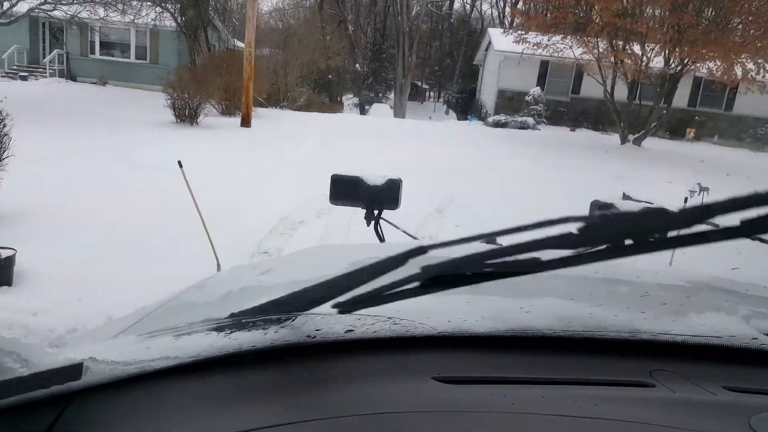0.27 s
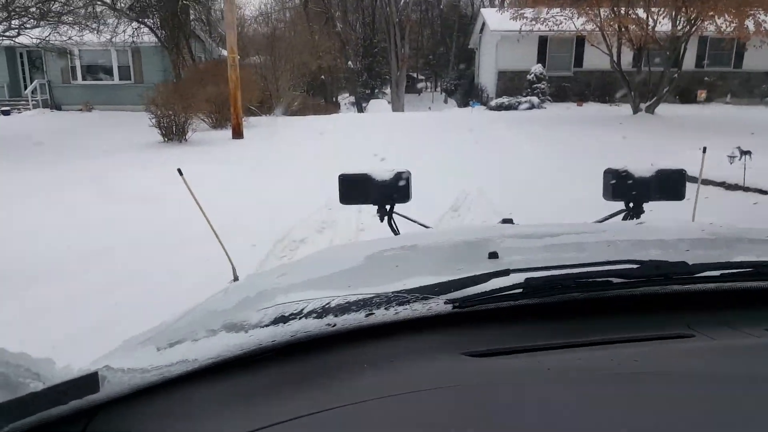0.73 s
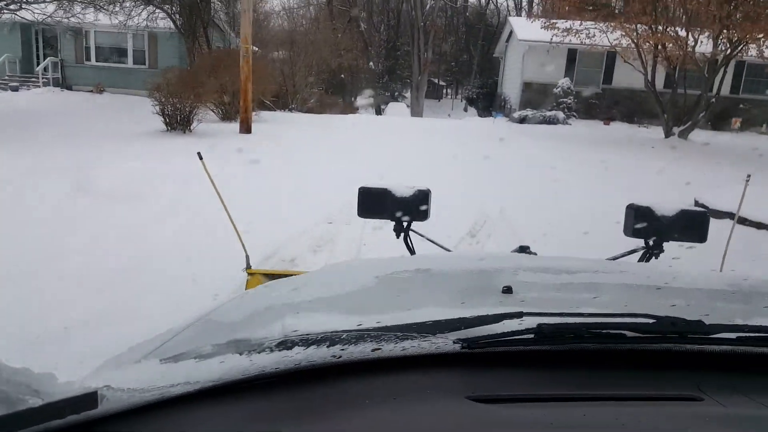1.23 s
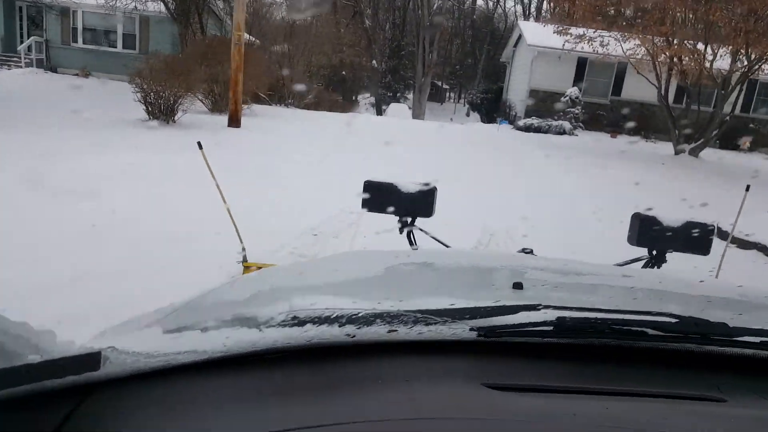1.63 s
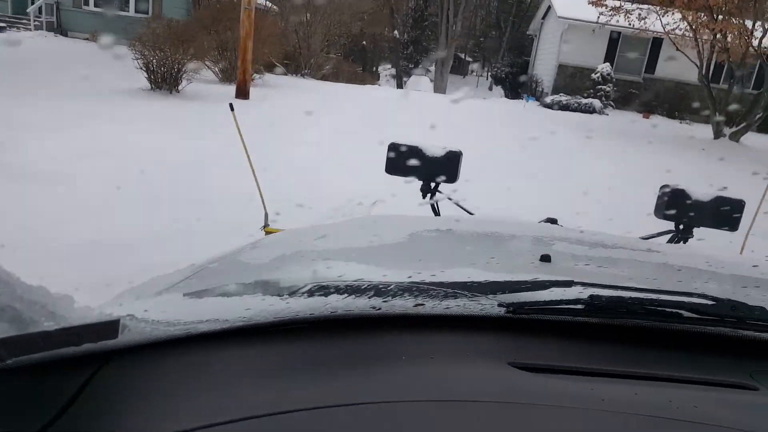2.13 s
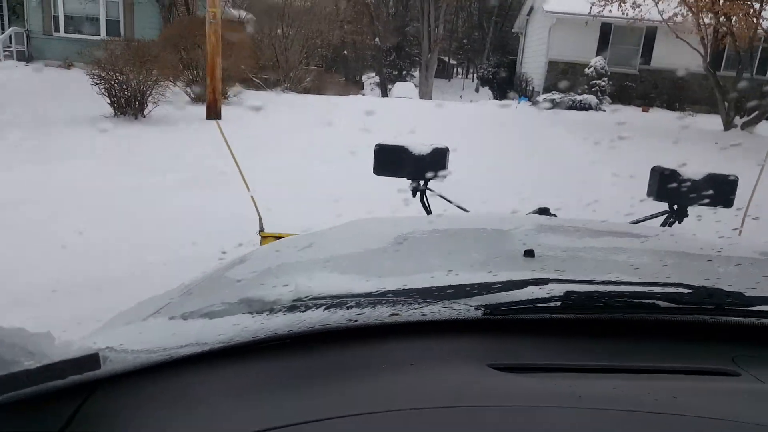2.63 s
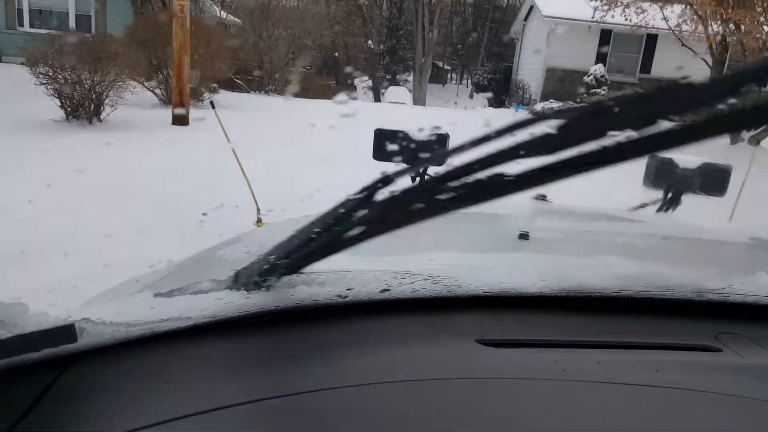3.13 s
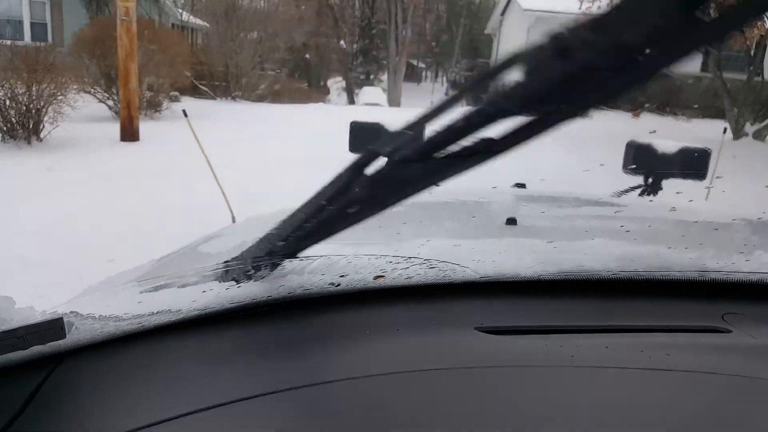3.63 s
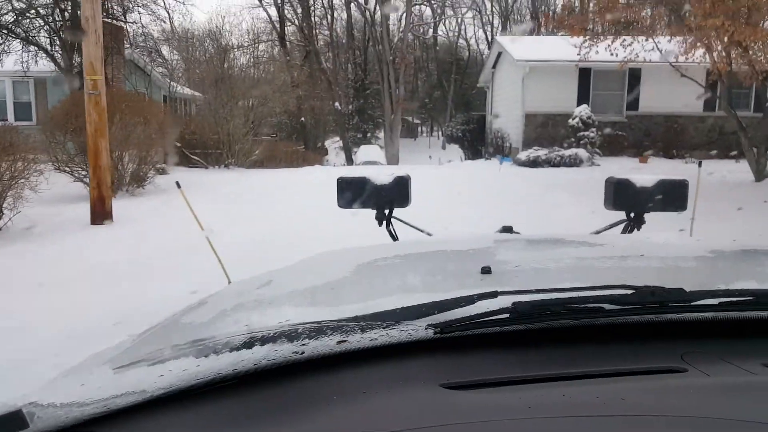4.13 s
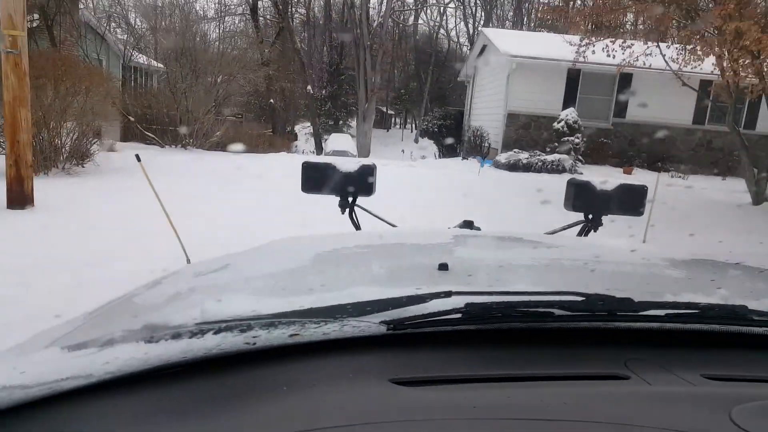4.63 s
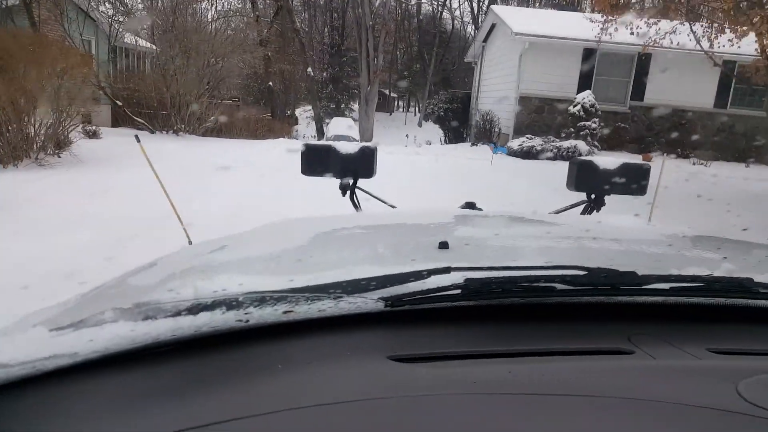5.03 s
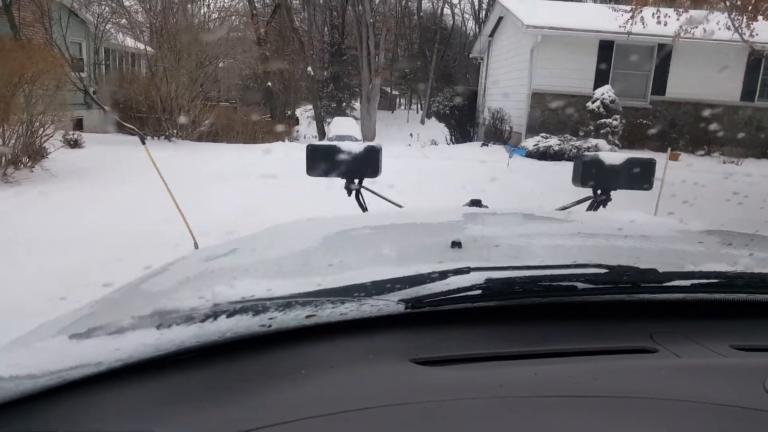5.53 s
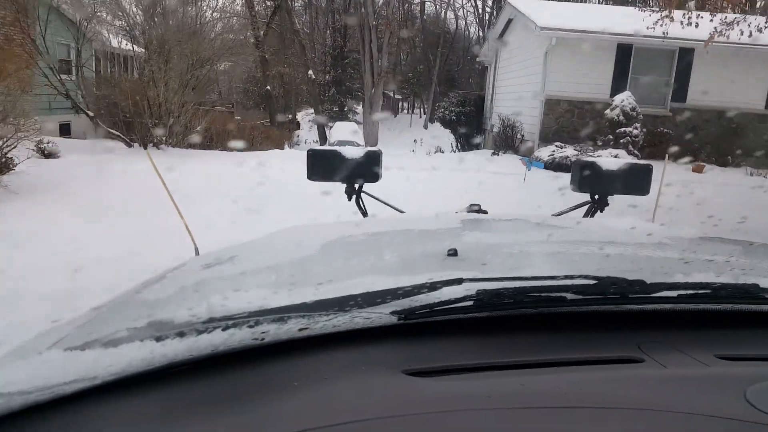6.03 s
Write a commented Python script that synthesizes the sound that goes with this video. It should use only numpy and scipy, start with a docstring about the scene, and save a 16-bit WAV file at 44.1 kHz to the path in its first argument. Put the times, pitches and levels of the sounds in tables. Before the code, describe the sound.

Inside a rumbling truck cab pushing snow, a flasher relay clicks steadily while the blade grinds once, metal clanks, and wipers judder across wet glass.

```python
"""Snow plow cab, pushing along a driveway.

Noise bands and a wandering tone make the engine and the cab's boom, following the load on the plow.
Coloured noise and tiny impacts make the blade scrape, chatter and grind, and the wipers swish and judder.
Short bursts and decaying modes make the flasher relay, loose gear, clicks, trim and lumps of snow.
Decaying low tones are the jolts; filtered impulses are fingers knocking on the hand-held phone."""
import sys
import numpy as np
from scipy import signal
from scipy.fft import rfft, irfft, next_fast_len
from scipy.io import wavfile
from scipy.ndimage import uniform_filter1d

SR = 44100
rng = np.random.default_rng(int(sys.argv[2]) if len(sys.argv) > 2 else 0)


def materialize(psi):
    """Save the field psi as 16-bit PCM at rate SR to the path in sys.argv[1].

    A 1-D psi becomes a single channel; in a 2-D psi each row is a channel.
    """
    bounded = np.clip(np.atleast_2d(psi).T, -1, 1)
    quanta = np.round(bounded * 32767).astype(np.int16)
    wavfile.write(sys.argv[1], SR, quanta)


N = 276507
T = np.arange(N) / SR
FALL = np.log(1000)  # a fall of 60 dB, as an exponent
PULL_LEFT = np.array([[1], [.4]])  # gains of a signal fed to both inputs of ports()


def undb(db):
    """Decibels to gain."""
    return 10 ** (np.asarray(db) / 20)


def unit(x):
    """Scale to an rms of 1."""
    return x / np.sqrt(np.mean(x ** 2))


def curves(table):
    """Each column of a table as a control over time."""
    seconds, *columns = np.transpose(table)
    return [np.interp(T, seconds, column) for column in columns]


def per_bin(points):
    """Points joined on a log-frequency axis, one value per FFT bin."""
    hz, value = np.transpose(points)
    bins_hz = np.fft.rfftfreq(next_fast_len(N), 1 / SR)
    return np.interp(np.log(bins_hz + 1), np.log(hz), value)


def colour(x, points):
    """Causal filter with the shape of a spectrum, closed ends and unit power gain."""
    size = next_fast_len(N)
    closed = [(points[0][0] / 2, -70), *points, (points[-1][0] * 2, -80)]
    gain = unit(undb(per_bin(closed)))
    # folding the cepstrum gives minimum phase, so nothing sounds before its cause
    cepstrum = irfft(np.log(gain), size)
    cepstrum[1:size // 2] *= 2
    cepstrum[size // 2 + 1:] = 0
    response = np.exp(rfft(cepstrum))
    return irfft(rfft(x, size) * response, size)[..., :N]


def noise():
    """Two unrelated white noises."""
    return rng.standard_normal((2, N))


def even(x, span_s):
    """Take out swells slower than the span, so that the gain applied afterwards sets the level."""
    power = uniform_filter1d(x ** 2, int(span_s * SR), axis=-1)
    return x / np.sqrt(power + 1e-9)


def flicker(rate_hz, depth_db):
    """A gain that wavers at random, up to about the given rate."""
    smooth = signal.butter(2, rate_hz, fs=SR, output="sos")
    return undb(depth_db * unit(signal.sosfilt(smooth, rng.standard_normal(N))))


def wander(centre_hz, spread_hz):
    """A rough tone whose strength and phase wander quickly."""
    phase = 2 * np.pi * np.cumsum(centre_hz) / SR
    smooth = signal.butter(2, spread_hz, fs=SR, output="sos")
    sine_part = signal.sosfilt(smooth, noise()) * np.sin(phase)
    cosine_part = signal.sosfilt(smooth, noise()) * np.cos(phase)
    return unit(sine_part + cosine_part)


def grains(rate, spread_db, t60):
    """Random tiny impacts (rate per second) of uneven size, each a short burst of noise."""
    size = undb(spread_db * np.minimum(rng.exponential(size=N), 4))
    hits = (rng.random(N) < rate / SR) * size ** 2
    power = signal.lfilter([1], [1, -np.exp(-2 * FALL / (t60 * SR))], hits)
    return unit(np.sqrt(power) * noise())


def bursts(rows, rise_s):
    """Envelope of blows (seconds, dB, t60 in seconds) that rise quickly and die away."""
    out, t = np.zeros(N + SR), T[:SR // 3]
    for s, db, t60 in rows:
        start = max(int(s * SR), 0)
        rise = 1 - np.exp(-t / rise_s)
        out[start:start + len(t)] += undb(db) * rise * np.exp(-FALL * t / t60)
    return out[:N]


def impulses(rows):
    """One sharp push for each row (seconds, dB)."""
    push = np.zeros(N)
    for s, db in rows:
        push[int(s * SR)] = undb(db)
    return push


def ring(push, modes):
    """Decaying modes (Hz, dB, t60 in seconds) driven by a force."""
    out = 0
    for hz, db, t60 in modes:
        r, w = np.exp(-FALL / (t60 * SR)), 2 * np.pi * hz / SR
        mode = signal.lfilter([0, r * np.sin(w)], [1, -2 * r * np.cos(w), r * r], push + 1e-18)
        out = out + undb(db) * mode
    return out


# Centre of the engine's drone. Each row: time in seconds, frequency in Hz.
DRONE_PITCH = [(0, 135), (.8, 150), (1.3, 198.8), (2.4, 215), (2.85, 150.4), (4.7, 156.8), (6.27, 124.1)]
# Deep throb of the cab, with one strong swell. Each row: time in seconds, level in dB.
THROB_LEVEL = [(0, -35.5), (3.45, -41), (3.72, -25.5), (3.95, -36), (4.25, -35.5), (5.45, -36), (5.9, -33),
               (6.27, -36)]
THROB_HZ = 68.35
ENGINE_DB, ENGINE_FOLLOW = -27, 0.94  # level at cruising load in dB, dB per dB of load


def engine():
    """Rough drone of the loaded engine, with a deep throb of the cab under it."""
    drone = even(wander(curves(DRONE_PITCH)[0], spread_hz=16.5), span_s=0.072)
    throb = even(wander(np.full(N, THROB_HZ), spread_hz=6.4), span_s=0.41)
    drone_gain = undb(ENGINE_DB + ENGINE_FOLLOW * strain())
    return drone * drone_gain + throb * undb(curves(THROB_LEVEL)[0])


# Load on the plow, as the level of the cab's rumble. Each row: time in seconds, level in dB.
PLOW_LOAD = [(0, -19.5), (.13, -28.5), (.22, -23), (.48, -17.5), (.56, -18), (.7, -13), (.97, -16),
             (1.28, -19.5), (1.67, -12.5), (1.82, -21.5), (2.23, -17), (2.55, -20.5), (2.9, -12),
             (3.1, -16), (3.47, -24), (3.67, -18), (3.86, -21), (4.62, -18), (4.98, -20.5), (5.5, -16.5),
             (5.92, -22), (6.27, -18)]
CRUISE_DB = -19  # the load of steady pushing


def strain():
    """Load on the plow in dB above steady pushing."""
    return curves(PLOW_LOAD)[0] - CRUISE_DB


# Spectra of the cab air, the chassis and the panels.
# Each row: frequency in Hz, relative level in dB per Hz.
BOOM_SPECTRUM = [(70, -29.5), (100, -7.5), (118, -3), (150, -1), (175, -4.5), (205, -4), (245, -7.5),
                 (280, -10), (340, -34)]
SHUDDER_SPECTRUM = [(15, -21), (28, -17.5), (40, -2), (50, -9), (64, 5), (74, -1.5), (88, 8), (100, -14),
                    (130, -44.5)]
PANEL_SPECTRUM = [(230, -24), (295, 4), (325, -1), (360, 1), (405, -3), (435, -8.5), (475, -10), (570, -10),
                  (660, -15), (708, -20), (760, -13.5), (950, -20.5), (1400, -28.5)]
# Ringing panels. Each row: frequency in Hz, relative level in dB, t60 in seconds.
PANEL_RING = [(364.8, -1, 0.24), (426.8, -4.5, 0.26), (700, -6.5, 0.22)]
# each layer: level at cruising load in dB, dB per dB of load
BOOM_DB, BOOM_FOLLOW = -22.5, 1.0
SHUDDER_DB, SHUDDER_FOLLOW = -29, 1
PANEL_DB, PANEL_FOLLOW = -31.5, 1
PANEL_FADE_DB_PER_S = 0.5  # the panels calm down as the snow thins


def cab():
    """The loaded plow frame shakes the chassis, the cab air and the panels."""
    load = strain()
    boom = even(colour(noise(), BOOM_SPECTRUM), span_s=0.055)
    shudder = even(colour(noise(), SHUDDER_SPECTRUM), span_s=0.16)
    panel_ring = unit(ring(noise(), PANEL_RING))
    panels = even(colour(noise(), PANEL_SPECTRUM) + undb(-8.0) * panel_ring, span_s=0.061)
    boom = boom * undb(BOOM_DB + BOOM_FOLLOW * load)
    shudder = shudder * undb(SHUDDER_DB + SHUDDER_FOLLOW * load)
    panels = panels * undb(PANEL_DB + PANEL_FOLLOW * load - PANEL_FADE_DB_PER_S * T)
    lumps = flicker(rate_hz=6.7, depth_db=1.9)  # uneven ground under the blade
    return lumps * (boom + panels + shudder)


BANK_S = 0.74  # moment of greatest force as the blade rams a packed bank


def bank(rise_db_per_s, fall_db_per_s):
    """Gain that builds as the blade rams the packed bank and dies away after it."""
    return undb(np.minimum(rise_db_per_s * (T - BANK_S), fall_db_per_s * (BANK_S - T)))


# Spectra of the scraping edge (also the wipers' swish) and of hard loose things (also the wipers'
# spray and the relay's tick). Each row: frequency in Hz, relative level in dB per Hz.
SCRAPE_SPECTRUM = [(500, -21), (900, -1.5), (1150, 3.5), (1400, -1), (1650, 0), (1900, 0), (2150, -3),
                   (2500, -5), (3200, -13.5), (4500, -38.5), (9000, -46)]
RATTLE_SPECTRUM = [(1500, -19.5), (2500, 9), (4500, 1.5), (6000, 0), (7500, 1), (8800, -2), (10200, -13.5),
                   (11500, -7), (15500, -8)]
# level at cruising load in dB, dB per dB of load
SCRAPE_DB, SCRAPE_FOLLOW = -53, 0.26
CHATTER_DB, CHATTER_FOLLOW = -67, .15
BANK_CHATTER_DB, CHATTER_RISE_DB_PER_S, CHATTER_FALL_DB_PER_S = -47.5, 68, 72.5


def blade():
    """The edge scrapes and loose things chatter with it, more under load; the bank adds chatter."""
    load = strain()
    catches = grains(rate=400, spread_db=1.0, t60=0.027)
    scrape = colour(noise() + undb(-11.5) * catches, SCRAPE_SPECTRUM)
    scrape_gain = undb(SCRAPE_DB + SCRAPE_FOLLOW * load)
    chatter = colour(noise() + undb(1.0) * grains(rate=250, spread_db=4.0, t60=0.027), RATTLE_SPECTRUM)
    steady_gain = undb(CHATTER_DB + CHATTER_FOLLOW * load)
    bank_gain = undb(BANK_CHATTER_DB) * bank(CHATTER_RISE_DB_PER_S, CHATTER_FALL_DB_PER_S)
    chatter_gain = np.hypot(steady_gain, bank_gain)
    return flicker(rate_hz=18, depth_db=1.4) * (scrape * scrape_gain + chatter * chatter_gain)


# Packed snow grinding on the blade. Each row: frequency in Hz, relative level in dB per Hz.
GRIND_SPECTRUM = [(500, -15), (900, 1), (1400, 0), (1900, -5), (2170, 2), (2500, -9), (3200, -10.5),
                  (4700, -17.5), (6500, -34.5)]
GRIND_DB, GRIND_RISE_DB_PER_S, GRIND_FALL_DB_PER_S = -35, 62, 46


def grind():
    """Packed snow breaks into dense tiny impacts on the blade as it rams the bank."""
    grit = even(grains(rate=430, spread_db=0.5, t60=0.011), span_s=0.038)
    fitful = grit * flicker(rate_hz=28, depth_db=1.5)
    force = bank(GRIND_RISE_DB_PER_S, GRIND_FALL_DB_PER_S)
    return colour(fitful, GRIND_SPECTRUM) * undb(GRIND_DB) * force


# Faint dry trim ticks. Each row: frequency in Hz, relative level in dB per Hz.
TICK_SPECTRUM = [(2000, -16.5), (4000, -7.5), (8500, -1), (10200, -7.5), (12000, 1), (15500, -5)]


def trim(count=60):
    """The shaking dashboard ticks faintly at random moments, each tick a tiny noise burst."""
    rows = [(when * T[-1], -56 + 4 * (2 * size - 1), 0.008)
            for when, size in rng.random((count, 2))]
    return undb(9.5) * colour(bursts(rows, rise_s=0.0012) * noise(), TICK_SPECTRUM)


# Rubber dragging over wet glass. Each row: start in seconds, relative level in dB, t60 in seconds.
RUBBER_STROKES = [(.004, -37, 0.38), (2.885, -33.5, 0.089), (2.903, -25.5, 0.085), (2.988, -30.5, 0.088),
                  (3.429, -31, 0.087), (3.472, -35, 0.072), (3.514, -30, 0.069), (3.568, -33.5, 0.056),
                  (3.803, -31, 0.067)]
# Tone of the rubber. Each row: frequency in Hz, relative level in dB per Hz.
RUBBER_SPECTRUM = [(600, 6.5), (1000, 0), (1900, -1.5), (2600, -4), (3200, -13), (4500, -18.5),
                   (6500, -24.5), (9000, -32), (12000, -48)]
SWEEP_S, SWEEP_EVERY_S, SWEEP_HALF_S = 0.033, 3.435, 0.22  # middle of first, interval, half length
SWISH_DB, SPRAY_DB = -50, -58.5
JUDDER_HZ, JUDDER_DEPTH = 124.4, 0.52  # stick and slip: mean rate, depth 0-1


def wiper():
    """Each sweep swishes over the wet glass; the rubber grips and slips in short juddering strokes."""
    middles = [SWEEP_S + k * SWEEP_EVERY_S for k in range(2)]
    sweeps = sum(np.exp(-((T - middle) / SWEEP_HALF_S) ** 2) for middle in middles)
    swish = undb(SWISH_DB) * colour(noise(), SCRAPE_SPECTRUM)
    spray = undb(SPRAY_DB) * colour(grains(rate=110, spread_db=-3, t60=.02), RATTLE_SPECTRUM)
    slip = np.cumsum(JUDDER_HZ * flicker(rate_hz=30, depth_db=0.5)) / SR % 1  # sawtooth
    grip = unit((1 - JUDDER_DEPTH * slip) ** 2 * noise())
    strokes = colour(bursts(RUBBER_STROKES, rise_s=0.005) * grip, RUBBER_SPECTRUM)
    return sweeps * (swish + spray) + undb(0.5) * strokes


# Finger knocks on the phone body; the row at .5455 is a quick bounce of the loud one.
# Each row: time in seconds, relative level in dB.
FINGER_KNOCKS = [(0.054, -35), (0.089, -30), (.273, -34.5), (.542, -14.5), (.5455, -27.5), (.558, -28),
                 (1.347, -18.5), (1.462, -27)]
KNOCK_BEND_HZ, KNOCK_Q = 950, 0.64  # centre and sharpness of the all-pass phase turn


def knocks():
    """Soft taps bend the phone body; an all-pass delays some pitches more. Mostly at the left port."""
    body_spectrum = [(350, -6.0), (560, 4.5), (780, -0.5), (1060, 6.5), (1350, -2.5), (1600, -4.5),
                     (2200, -14.5), (2700, -20.5), (3300, -41), (5000, -38)]  # Hz, dB per Hz
    body = colour(impulses(FINGER_KNOCKS), body_spectrum)
    poles = signal.iirpeak(KNOCK_BEND_HZ, KNOCK_Q, fs=SR)[1]
    bent = signal.lfilter(poles[::-1], poles, body)
    return undb(27.0) * bent * np.array([[1], [undb(-20.5)]])


# Hard jolts of the plow frame. Each row: start in seconds, frequency in Hz, relative level in dB.
FRAME_JOLTS = [(0.168, 135.7, -15.5), (0.373, 130.6, -10), (0.473, 198, -12), (.675, 157.4, -7.5),
               (0.734, 68.8, -8.5), (0.814, 158.2, -1.5), (1.02, 101.3, -8.5), (1.1, 145.2, -6),
               (1.171, 194.7, -5.5), (1.371, 226.4, -9), (1.541, 117, -2.5), (1.632, 189.8, -3.5),
               (1.985, 199.6, -9.5), (2.09, 224, -13.5), (2.224, 193, -7), (2.825, 170.6, -14.5),
               (2.942, 160.4, -2.5), (3.066, 147, -4), (3.276, 175.4, -6), (3.603, 161.2, -2),
               (3.972, 146.7, -11.5), (4.423, 149, -7), (4.995, 154.6, -13), (5.095, 150.8, -6),
               (5.31, 144.2, -7), (5.536, 134.3, -6), (5.99, 151.6, -9), (6.13, 139.2, -4),
               (6.225, 122.7, -9.5)]


def jolts(swell_s):
    """Each jolt sets the cab booming for a few cycles, a sine that swells and dies away."""
    out = np.zeros(N)
    for s, hz, db in FRAME_JOLTS:
        t = np.maximum(T - s, 0)
        swell = t / swell_s * np.exp(1 - t / swell_s)
        out += undb(db) * swell * np.sin(2 * np.pi * hz * t)
    return undb(-5.5) * out * np.array([[1], [0]])


def snaps(rows, t60):
    """Force of the relay armature landing and bouncing once, 19 ms later and 18 dB weaker."""
    landings = [(s, db, t60) for s, db in rows]
    bounces = [(s + 0.019, db - 18.0, t60) for s, db in rows]
    return bursts(landings + bounces, rise_s=0.0023)


# Relay case modes. Each row: frequency in Hz, relative level closing in dB, and opening in dB.
RELAY_CASE = [(2250, -7.5, 7), (4060, 2, -14), (5230, -4, -3.5), (6430, -5.5, -8.5), (8750, -2.5, 0),
              (8950, -1, -5.5), (14100, -9.5, -1.5), (14800, -7, -14)]
# Dull clack in the dashboard. Each row: frequency in Hz, relative level in dB per Hz.
CLACK_SPECTRUM = [(400, -26.5), (620, -16), (850, 3.5), (1000, 4), (1200, 13.5), (1500, -14), (2300, -14.5),
                  (3200, -27.5)]
# Dashboard around the relay. Each row: frequency in Hz, relative level in dB, t60 in seconds.
DASHBOARD = [(864, 3.5, 0.092), (1065, 5.5, 0.069), (1252, 3.5, 0.044)]
# How hard the armature lands on closing. One entry per cycle: relative level in dB.
CLOSING_STRENGTH = [-1.5, 0, 0, 0.5, -8, 0, 0, 0]
FLASH_START_S, FLASH_PERIOD_S, FLASH_ON_S = .3244, .7499, .3695
CLOSE_DB, OPEN_DB = -35, -37  # force, before the gains of each part
RELAY_T60_S = .011


def relay():
    """The armature snaps in and falls back: dull dashboard clack, dry tick and short case ring."""
    starts = FLASH_START_S + FLASH_PERIOD_S * np.arange(len(CLOSING_STRENGTH))
    closes = [(s, CLOSE_DB + db) for s, db in zip(starts, CLOSING_STRENGTH)]
    opens = [(s + FLASH_ON_S, OPEN_DB) for s in starts]
    closing, opening = snaps(closes, t60=0.036), snaps(opens, t60=0.031)
    closing_modes = [(hz, db, RELAY_T60_S) for hz, db, _ in RELAY_CASE]
    opening_modes = [(hz, db, RELAY_T60_S) for hz, _, db in RELAY_CASE]
    case = ring(closing * noise(), closing_modes) + ring(opening * noise(), opening_modes)
    clack = (closing + undb(-5.0) * opening) * even(colour(noise(), CLACK_SPECTRUM), span_s=0.00082)
    dash = ring(impulses([(s + 0.00054, db) for s, db in closes]), DASHBOARD) * PULL_LEFT
    tick = colour((closing + opening) * noise(), RATTLE_SPECTRUM)
    return undb(-20.5) * case + undb(12.5) * clack + undb(-1) * dash + undb(-2.5) * tick


# Loose gear shifting. Each row: start in seconds, relative level in dB, t60 in seconds.
GEAR_SHIFTS = [(.581, -39, 0.066), (.615, -38.5, 0.15), (.728, -53, 0.016), (.760, -29.5, 0.14),
               (.794, -36.5, 0.18), (.903, -48.5, 0.19)]
# Tone of the gear. Each row: frequency in Hz, relative level in dB per Hz.
CRUNCH_SPECTRUM = [(300, -16.5), (700, 0.5), (1300, -2.5), (2150, 3), (3000, -5), (4200, -8), (6100, -5),
                   (7200, -11), (9000, -11), (10200, -25), (11500, -17), (15500, -17.5)]


def loose_gear():
    """Loose gear shifts in short crunching bursts of many tiny impacts."""
    rattle = even(grains(rate=510, spread_db=-0.5, t60=0.022), span_s=0.024)
    return undb(6.5) * colour(bursts(GEAR_SHIFTS, rise_s=0.0056) * rattle, CRUNCH_SPECTRUM)


# Small hard pieces in the cab. Each row: start in seconds, relative level in dB, t60 in seconds.
HARD_CLICKS = [(0.612, -37, 0.02), (0.622, -38.5, 0.04), (1.520, -52, 0.014), (1.886, -52, 0.064),
               (1.906, -55, 0.044), (2.134, -51, 0.06), (2.147, -58, 0.045), (3.058, -54, 0.044),
               (3.151, -57.5, 0.023), (3.632, -57, 0.019), (3.815, -58.5, 0.1), (4.241, -54, 0.013),
               (4.474, -57, 0.039), (4.618, -57, 0.045), (4.671, -48.5, 0.041), (5.099, -55, 0.029),
               (6.113, -47.5, 0.012)]
# Tone of their dry tick. Each row: frequency in Hz, relative level in dB per Hz.
CLICK_SPECTRUM = [(1200, -32), (3000, -10), (5000, -7.5), (7500, 5.5), (9200, 2), (10200, -13),
                  (11300, -2.5), (13500, -7), (15500, -4.5)]


def clicks(low_hz, high_hz, count=5):
    """Every small hard piece gives a dry tick and rings briefly at a few notes of its own."""
    notes = np.zeros((2, N))
    t = T[:SR // 10]
    for (s, db, t60), draw in zip(HARD_CLICKS, rng.random((len(HARD_CLICKS), 3, count))):
        hz = low_hz * (high_hz / low_hz) ** draw[0]
        phases = draw[1:, :, None]  # turns, one set for each of the two signals
        tones = np.sin(2 * np.pi * (hz[:, None] * t + phases)).mean(axis=1)
        start = int(s * SR)
        notes[:, start:start + len(t)] += undb(db) * tones * np.exp(-FALL * t / (1.5 * t60))
    ticks = colour(bursts(HARD_CLICKS, rise_s=0.0013) * noise(), CLICK_SPECTRUM)
    return notes + undb(9.0) * ticks


# Lumps of snow striking the blade. Each row: start in seconds, relative level in dB.
SNOW_LUMPS = [(0.613, -21.5), (0.701, -25), (0.736, -28.5), (0.782, -23), (2.904, -24), (3.935, -30.5)]
# Tone of the thud. Each row: frequency in Hz, relative level in dB per Hz.
THUD_SPECTRUM = [(250, -8.5), (400, 8.5), (620, -5), (900, -13), (1600, -20)]
THUD_T60_S = .08


def thuds():
    """Hard lumps of snow strike the blade with a dull, short thud of low noise."""
    envelope = bursts([(s, db, THUD_T60_S) for s, db in SNOW_LUMPS], rise_s=0.0072)
    return undb(8.5) * envelope * even(colour(noise(), THUD_SPECTRUM), span_s=0.0036)


# Blows on a loose metal fitting. Each row: time in seconds, relative level of the ring in dB,
# relative level of the crack in dB.
FITTING_BLOWS = [(.797, -36, -34.5), (1.6625, -22.5, -25.5)]
# Modes of the fitting. Each row: frequency in Hz, relative level in dB, t60 in seconds.
FITTING_MODES = [(725, -2.5, 0.24), (1650, 0.5, 0.055), (1900, -14, 0.033), (2140, 4.5, 0.049),
                 (2300, -19, 0.026), (2610, -3, 0.036), (3340, -10, 0.018), (4690, -15, 0.08),
                 (9200, -12, 0.055)]
# Crack of metal on metal. Each row: frequency in Hz, relative level in dB per Hz.
CRACK_SPECTRUM = [(590, -32), (1000, 5), (1430, -16.5), (1640, 3), (1820, -10.5), (2180, -13.5), (2620, -7),
                  (4050, -17), (5150, -16.5), (9360, -22), (15500, -28.5)]
CRACK_T60_S = 0.055


def fitting():
    """A loose metal fitting clanks: a crack of noise at each blow, then its ringing modes."""
    envelope = bursts([(s, db, CRACK_T60_S) for s, _, db in FITTING_BLOWS], rise_s=0.0038)
    cracks = colour(envelope * noise(), CRACK_SPECTRUM)
    metal = ring(impulses([(s, db) for s, db, _ in FITTING_BLOWS]), FITTING_MODES)
    return undb(7.0) * cracks + undb(-3.0) * metal * PULL_LEFT


# Contacts of the latch. Each row: time in seconds, relative level in dB.
LATCH_CONTACTS = [(1.662, -45.5), (1.6835, -29.5), (1.69, -47.5)]
# Modes of the latch. Each row: frequency in Hz, relative level in dB, t60 in seconds.
LATCH_MODES = [(4070, -3, 0.04), (4620, -6.5, 0.062), (7050, -5.5, 0.059), (8694, -4.5, 0.043),
               (9570, -6.5, .045), (11100, -8, 0.06), (12200, -13, 0.06), (14620, -10, .04)]
# Noise of the snap. Each row: frequency in Hz, relative level in dB per Hz.
SNAP_SPECTRUM = [(700, 1.5), (2500, 5), (4200, -0.5), (6300, -6), (9200, -1), (10300, -19), (11500, -8.5),
                 (15500, -11)]
SNAP_T60_S = 0.077


def latch():
    """A latch snaps along with the fitting's second blow: bright noise and high ringing modes."""
    envelope = bursts([(s, db, SNAP_T60_S) for s, db in LATCH_CONTACTS], rise_s=0.0016)
    snap = colour(envelope * noise(), SNAP_SPECTRUM)
    return undb(-1) * snap + ring(impulses(LATCH_CONTACTS), LATCH_MODES) * PULL_LEFT


# Likeness of the two microphone ports. Each row: frequency in Hz, likeness 0-1.
PORT_LIKENESS = [(60, .97), (150, .95), (280, .88), (500, .6), (1000, .4), (3000, .35)]
# Level of the left port over the right. Each row: frequency in Hz, level difference in dB.
PORT_LEAN = [(60, 2.5), (380, 0.9), (700, 5), (1150, 5), (1700, 12), (2380, 6.5), (4400, -6), (8120, 3.5),
             (15000, 1.5)]
# The left port hears the treble later. Each row: frequency in Hz, delay in seconds.
PORT_LAG = [(650, 0), (1100, .0005)]


def ports(pair):
    """Two signals become the cab's sound field: alike in the bass, looser and lagging in the treble."""
    size = next_fast_len(N)
    fade = np.clip(np.minimum(T, T[-1] - T) / .008, 0, 1)
    common, differing = rfft(pair * fade, size)
    alike, lean = np.clip(per_bin(PORT_LIKENESS), 0, 1), per_bin(PORT_LEAN)
    late = np.exp(-2j * np.pi * np.fft.rfftfreq(size, 1 / SR) * per_bin(PORT_LAG))
    mid = common * np.sqrt((1 + alike) / 2)
    side = differing * np.sqrt((1 - alike) / 2)
    left = (mid + side) * late * undb(lean / 2)
    right = (mid - side) * undb(-lean / 2)
    return irfft(np.array([left, right]), size)[:, :N]


def scene():
    """Everything in the cab, plus the taps on the phone itself."""
    vehicle = engine() + cab() + jolts(swell_s=0.013)
    plow = blade() + grind() + thuds()
    loose = loose_gear() + fitting() + latch()
    small = trim() + relay() + clicks(low_hz=5270, high_hz=12100)
    return ports(vehicle + plow + wiper() + loose + small) + knocks()


TOP_HZ = 15850


def record(dry):
    """The phone cuts the top with a steep low-pass."""
    return signal.sosfilt(signal.ellip(10, .2, 80, TOP_HZ, fs=SR, output="sos"), dry)


dry = scene()
out = record(dry)
materialize(out)
```